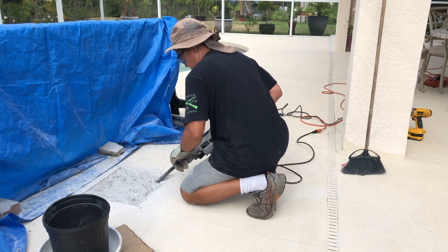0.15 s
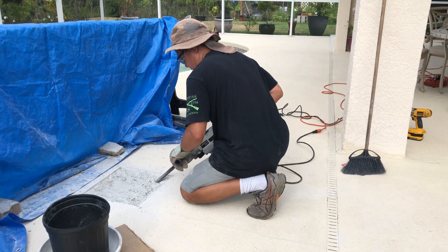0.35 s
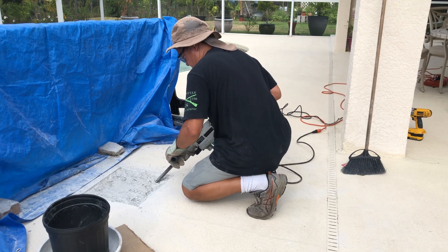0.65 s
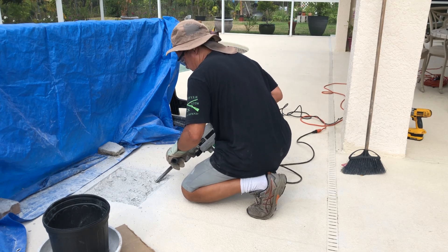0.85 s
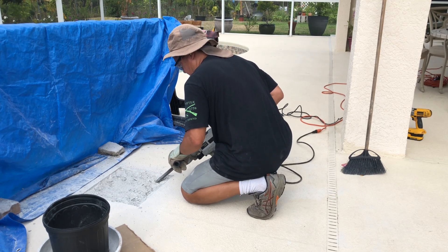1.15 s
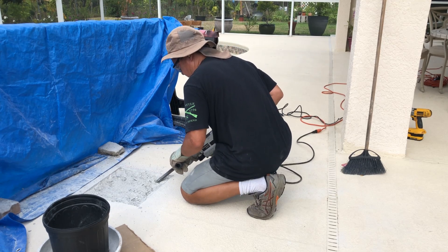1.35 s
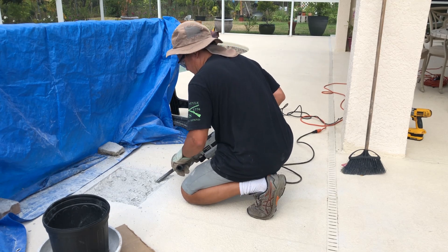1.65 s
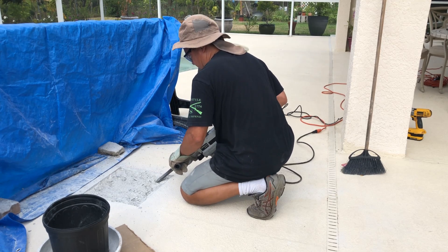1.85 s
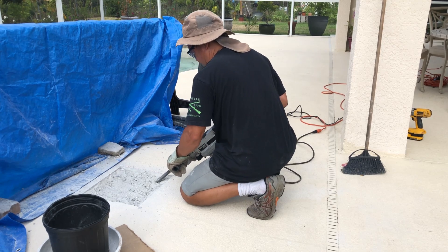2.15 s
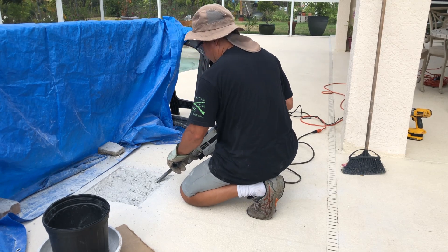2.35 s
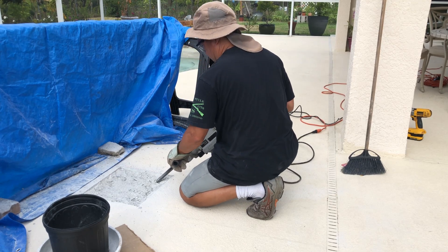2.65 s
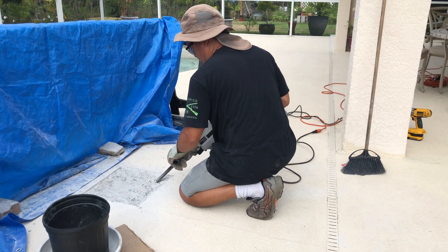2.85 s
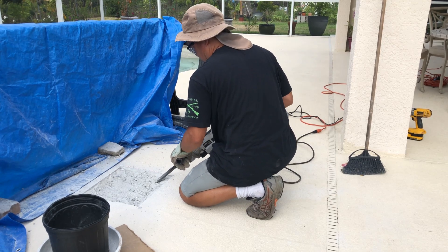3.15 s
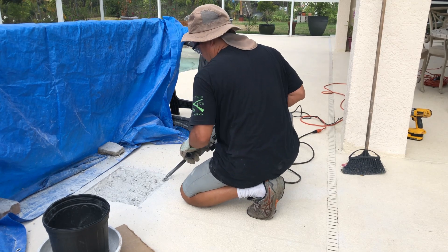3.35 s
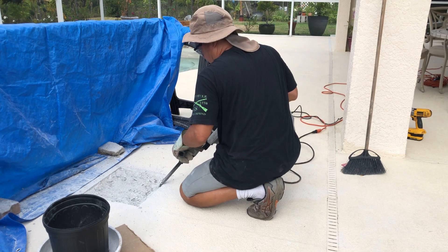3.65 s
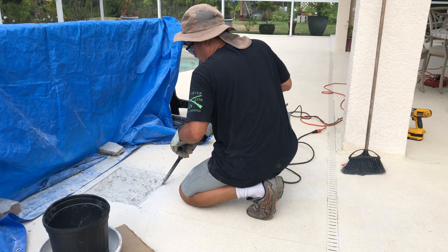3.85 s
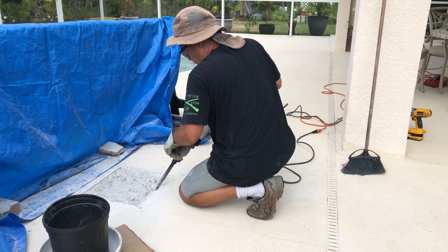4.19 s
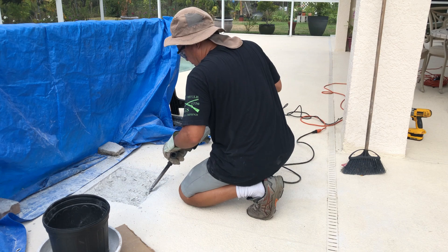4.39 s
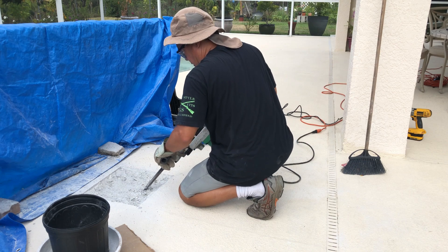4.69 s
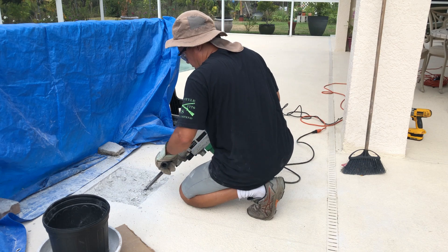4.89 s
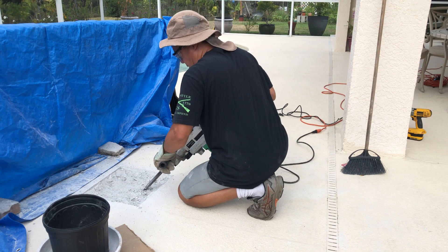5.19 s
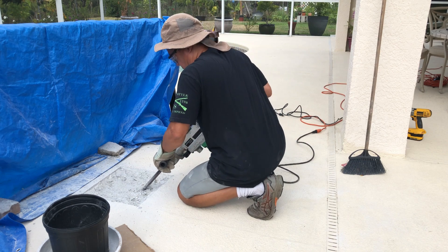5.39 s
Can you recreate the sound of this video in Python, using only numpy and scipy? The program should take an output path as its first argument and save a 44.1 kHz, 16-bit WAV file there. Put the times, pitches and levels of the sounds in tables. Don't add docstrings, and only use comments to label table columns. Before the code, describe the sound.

A loud, dense rattle of hammer blows on concrete runs for over two seconds, thudding low and crackling bright over fan hiss and whine. The blows falter and the rotor slows with falling pitch. Metal knocks, clinks and gritty scrapes follow in a quiet yard, before a last short burst of hammering builds. Small close microphone, light reflections from walls and roof.

```python
import sys
import numpy as np
from scipy import signal
from scipy.fft import rfft, irfft, next_fast_len
from scipy.io import wavfile
from scipy.ndimage import uniform_filter1d

SR = 44100
rng = np.random.default_rng(int(sys.argv[2]) if len(sys.argv) > 2 else 0)


def gain_from_db(level_db):
    decades = np.asarray(level_db, float) / 20
    return 10 ** decades


def dump_mix(stems):
    frames = np.atleast_2d(stems).T
    limited = np.clip(frames, -1, 1)
    pcm = np.round(limited * 32767).astype(np.int16)
    wavfile.write(sys.argv[1], SR, pcm)


N = 243873


def evened(x):
    return x / np.sqrt(np.mean(x ** 2) + 1e-20)


def coloured(x, points):
    size = next_fast_len(len(x))
    hz = np.fft.rfftfreq(size, 1 / SR)
    point_hz, point_db = np.transpose(points)
    gain_db = np.interp(np.log(hz + 1), np.log(point_hz + 1), point_db)
    return irfft(rfft(x, size) * gain_from_db(gain_db), size)[:len(x)]


def resonate(x, hz, width_hz):
    turn = np.exp(2j * np.pi * np.cumsum(hz * np.ones(len(x))) / SR)
    r = np.exp(-np.pi * width_hz / SR)
    return 2 * (turn * signal.lfilter([1 - r], [1, -r], x / turn)).real


def mode(x, hz, width_hz):
    r = np.exp(-np.pi * width_hz / SR)
    return evened(signal.lfilter([1, 0, -1], [1, -2 * r * np.cos(2 * np.pi * hz / SR), r * r], x))


def ringing(modes, seconds):
    t = np.arange(round(seconds * SR)) / SR
    return sum(gain_from_db(db - 60 * t / t60) * np.sin(2 * np.pi * hz * t) for hz, db, t60 in modes)


def clicks(times, sizes):
    at = np.round(np.asarray(times) * SR).astype(int)
    inside = (at >= 0) & (at < N)
    return np.bincount(at[inside], (sizes * np.ones(len(at)))[inside], N)


def patchy(x, patch_db):
    z = signal.stft(x, nperseg=512)[2]
    field = uniform_filter1d(rng.standard_normal(z.shape), size=7, axis=0)
    field = uniform_filter1d(field, size=12, axis=1)
    return signal.istft(z * gain_from_db(patch_db * evened(field)), nperseg=512)[1][:N]


def swell(middle, length, db):
    phase = np.clip((np.arange(N) / SR - middle) / length, -.5, .5)
    return gain_from_db(db) * np.cos(np.pi * phase) ** 2


def burst(rows, short_hz, short_width, short_db, tick_db, tilt_db, cut_hz, lead_s, rebound_db):
    free_blows = [2.3027, 2.3251, 2.3535, 2.3794, 2.4108, 2.439, 2.46, 2.468, 2.478, 2.488, 2.499, 2.512,
                  5.2547, 5.3022, 5.3393, 5.3724, 5.4039, 5.432, 5.46, 5.487, 5.5142]
    first_s, period_s, steady_blows = .00088, .0232406, 99
    thud_level_db, crack_level_db = -23, -24.5
    s, force, seat = np.transpose(rows)
    t = np.arange(N) / SR
    force_db, seat_db = np.interp(t, s, force), np.interp(t, s, seat)
    blows = np.append(first_s + period_s * np.arange(steady_blows), free_blows)
    blows = blows[abs(blows - s.mean()) < 2]
    luck = rng.standard_normal((len(blows), 8, 3))
    on = (t >= s[0]) & (t <= s[-1])
    level = lambda x: x / np.sqrt(np.mean(x[on] ** 2))

    thud = slab_thud(blows, luck, level, tilt_db, cut_hz, lead_s, rebound_db)
    grit, same = cracking(blows, luck, tick_db)
    crack, spall = breaking(grit, same, level, s)
    ring = singing(grit, level, s, short_hz, short_width, short_db)
    thud = gain_from_db(thud_level_db + force_db + seat_db) * thud
    bright = gain_from_db(crack_level_db + force_db) * crack + spall + ring
    fade_out = gain_from_db(-np.maximum(t - s[-1], 0) * 900.)
    return fade_out * np.array([thud, bright])


def slab_thud(blows, luck, level, tilt_db, cut_hz, lead_s, rebound_db):
    rebound_s = .018
    lead = round(lead_s * SR)
    landings = clicks(blows + .00003 * luck[:, 0, 0], gain_from_db(0.83 * luck[:, 0, 1]))
    rebound_sizes = gain_from_db(rebound_db + 3.9 * luck[:, 2, 1])
    landings = landings + clicks(blows + rebound_s + .0012 * luck[:, 1, 1], rebound_sizes)
    thud = level(signal.oaconvolve(landings, slab(tilt_db, cut_hz))[lead:][:N])
    return patchy(np.pad(thud, (0, lead)), 0.54)


def slab(tilt_db, cut_hz):
    # (frequency [Hz], width [Hz], level [dB])
    resonances = [(151.6, 110, -1.5), (187, 27, -0.5), (222, 16, 7.5), (268.2, 55, -3), (336, 119, 1.5),
                  (497, 45, -1), (642.7, 97, 3.5), (736, 420, -0.5), (962.6, 60, 1.5), (1130, 200, -17.5),
                  (1553, 197, -1.5), (1704, 61, -8.5), (2125, 110, -8), (2443, 233, -9)]
    echo_s, direct, bending = .0042, 0.84, .088
    hz = abs(np.fft.fftfreq(8192, 1 / SR))
    power = sum(gain_from_db(db) ** 2 / (1 + (2 * (hz - f) / width) ** 2) ** 2 for f, width, db in resonances)
    tilt = np.log(gain_from_db(tilt_db * np.log2(hz / 600 + 0.64)))
    bass_cut = np.log1p((cut_hz / (hz + 5)) ** 4)
    log_gain = np.log(power + 1e-9) / 2 + tilt - bass_cut
    trip = np.exp(-2j * np.pi * hz * echo_s)
    causal = np.exp(signal.hilbert(log_gain).conj()) * (trip - direct) / (1 - direct * trip)
    travel = np.exp(-4j * np.pi * bending * np.sqrt(hz))
    return irfft((causal * travel)[:len(hz) // 2 + 1])[:len(hz) // 2]


def cracking(blows, luck, tick_db):
    # (delay after the blow [s], level [dB])
    strikes = [
        (-.0028, -10.5),
        (-.0006, 2.5),
        (.0012, 0.5),
        (.003, -3),
        (.0045, -24),
        (.0085, -38),
        (0.0148, -16.5),
        (0.0184, -7),
    ]
    delay, snap_db = np.transpose(strikes)
    snap_db = snap_db + tick_db * (delay < -.002)
    times = blows[:, None] + delay + .00004 * luck[..., 0]
    snaps = clicks(times.ravel(), gain_from_db(snap_db + 1.1 * luck[..., 2]).ravel())
    u = np.arange(2000) / SR
    decay = gain_from_db(-60 * u / 0.0072) + 0.21 * gain_from_db(-60 * u / 0.057)
    fade = (1 - np.exp(-u / 0.00033)) * decay
    fresh = np.sqrt(abs(signal.oaconvolve(snaps ** 2, fade ** 2)[:N])) * rng.standard_normal(N)
    same = signal.oaconvolve(snaps, fade * rng.standard_normal(len(u)))[:N]
    return fresh + 1.14 * same, same


def breaking(grit, same, level, s):
    # (frequency [Hz], level [dB per Hz])
    grit_spectrum = [(90, -45), (710, -17.5), (1200, -3), (1350, -11), (1490, -13.5), (1640, -7),
                     (1930, -9.5), (3360, -2.5), (3830, -5.5), (7100, -6.5), (9820, -3), (16000, -13.5)]
    # (middle [s], length [s], level [dB], frequency [Hz], width [Hz])
    spalls = [(.05, 1, -42, 3420, 890), (.25, 0.8, -37.5, 8100, 302), (.3, .2, -35, 6850, 296),
              (.53, 0.39, -33, 3430, 1270), (.72, 0.99, -33.5, 5360, 300), (.85, 1, -36.5, 2320, 900),
              (.9, .6, -46, 9200, 296), (.93, 0.56, -35, 3080, 910), (1.16, 0.26, -32, 3580, 900),
              (1.55, 0.88, -40.5, 8500, 395), (1.85, 0.5, -36, 5600, 301), (2.02, 0.34, -28.5, 3270, 1100),
              (2.2, 0.23, -37.5, 5600, 300), (2.38, .035, -27.5, 5400, 400),
              (2.425, 0.075, -24.5, 4260, 500), (2.43, 0.061, -23.5, 4960, 498),
              (2.47, 0.11, -32.5, 4100, 1220), (5.3, .06, -33, 5200, 900), (5.45, 0.11, -35.5, 5000, 900),
              (5.36, 0.3, -31, 1750, 400)]
    crack = level(patchy(coloured(grit, grit_spectrum), 1.24))
    chips = coloured(grit + 0.46 * same, grit_spectrum)
    spall = np.zeros(N)
    for middle, length, db, hz, width in spalls:
        if s[0] <= middle <= s[-1]:
            spall += swell(middle, length, db) * level(resonate(chips, hz, width))
    return crack, spall


def singing(grit, level, s, short_hz, short_width, short_db):
    # (middle [s], length [s], level [dB], frequency [Hz])
    sings = [(.25, 1, -36.5, 9730), (.6, 0.33, -42, 9700), (1.03, 0.13, -30.5, 9900),
             (1.32, 0.75, -30.5, 9580), (1.56, 0.32, -33.5, 10230), (1.84, 0.27, -28.5, 9600),
             (2.2, .3, -32, 9560), (2.34, 0.19, -21.5, 9540), (5.262, 0.022, -25.5, 9000),
             (5.35, 0.23, -28, 9550), (5.48, 0.28, -26.5, 9530)]
    short = gain_from_db(short_db) * mode(grit, short_hz, short_width)
    ring = np.zeros(N)
    for middle, length, db, hz in sings:
        if s[0] <= middle <= s[-1]:
            ring += swell(middle, length, db) * level(mode(grit, hz, 30.0) + short)
    return ring


def motor():
    # (time [s], share of full speed)
    coast = [(2.29, 1), (2.4, .78), (2.87, .51), (3.2, .34), (3.5, .2), (3.8, .11), (4, .07), (5.17, .02)]
    restart_s, spin_up_s, switch_s = 5.17, .17, 5.185
    t = np.arange(N) / SR
    spin_up = 1 - np.exp(-(t - restart_s).clip(0) / spin_up_s)
    speed = np.maximum(np.interp(t, *np.transpose(coast)), spin_up)
    waver = evened(uniform_filter1d(rng.standard_normal(N), size=900))
    return airflow(t, speed, waver, switch_s) + gear_whine(speed, waver)


def airflow(t, speed, waver, switch_s):
    # (frequency [Hz], level [dB per Hz])
    fan = [(88, -61), (150, -13.5), (354, -4), (578, -14.5), (805, -8), (960, -12), (2400, -5), (5250, 2.5),
           (7920, -7), (10800, -3), (16000, -19)]
    # (frequency [Hz], level [dB per Hz])
    brush = [(290, -66), (500, -29), (855, -22), (988, -11.5), (1260, -16), (2610, -15), (5240, -15),
             (9630, -7), (12100, -5), (16000, -21)]
    # (frequency [Hz], width [Hz], level [dB])
    housing = [(2460, 400, -3), (4230, 53, -20.5), (5300, 83, -9), (6450, 45, 1), (9700, 82, -11),
               (9700, 190, -8), (11170, 150, -6), (12500, 180, -12)]
    level_db, knee, db_per_octave, strain_db = -39, 0.35, 5, 6
    stop_s, stop_db_per_s, soft_db, soft_s = 3.96, 348, -20.5, 0.082
    strain = np.minimum(uniform_filter1d(abs(np.gradient(speed)) * SR, size=3000), 2)
    stopping_db = -stop_db_per_s * (t - stop_s).clip(0)
    starting_db = soft_db * np.exp(-abs(t - switch_s) / soft_s)
    turning_db = np.where(t < switch_s, stopping_db, starting_db).clip(-80)
    hiss_db = level_db + db_per_octave * np.log2(np.minimum(speed / knee, 1)) + strain_db * strain + turning_db
    air = rng.standard_normal(N)
    air = air + 0.23 * evened(sum(gain_from_db(db) * mode(air, hz, w) * np.sqrt(w) for hz, w, db in housing))
    rush = np.maximum(np.clip(speed / 0.85, 0, 1) ** 1.19, t > switch_s)
    rotor = np.sin(2 * np.pi * np.cumsum(520.0 * speed * (1 + .3 * waver)) / SR)
    throb = 1 + np.clip(.4 - 0.5 * rush, 0, 1) * rotor
    hiss = rush * evened(coloured(air, fan)) + (1 - rush) * evened(coloured(air, brush))
    return gain_from_db(hiss_db) * patchy(hiss, 2.2) * throb


def gear_whine(speed, waver):
    # (multiple of the gear mesh, level [dB])
    gears = [(0.5, -14.5), (0.999, -3), (1.171, -10.5), (1.656, -11), (2.001, -5.5), (2.308, -13.5),
             (3.001, -1)]
    # (middle [s], length [s], mesh tone level [dB], its octave level [dB])
    loads = [
        (0.227, 1, -26.5, -39),
        (0.957, 0.4, -43, -37),
        (1.322, 0.53, -36.5, -42),
        (1.65, 1, -32.5, -35.5),
        (2.05, 0.62, -43, -38),
        (2.512, 0.13, -36.5, -45),
        (5.235, 0.11, -43, -56),
    ]
    mesh_hz, whine_db, db_per_octave = 3246, -31.5, 9
    turns = np.cumsum(mesh_hz * speed * (1 + 0.00025 * waver)) / SR
    whine = sum(gain_from_db(db) * np.sin(2 * np.pi * k * turns) for k, db in gears)
    whine = whine * gain_from_db(1.3 * evened(uniform_filter1d(waver[::-1], size=2500)))
    meshing = gain_from_db(whine_db + db_per_octave * np.log2(speed))
    whine = coloured(meshing * whine, [(1450, -28), (1750, -5.5), (3300, -14), (4300, -5),
                                       (5500, -12), (7500, -19.0)])
    for s, length, mesh_db, octave_db in loads:
        whine = whine + swell(s, length, mesh_db) * gain_from_db(2.53 * waver[::-1]) * np.sin(2 * np.pi * turns)
        whine = whine + swell(s, length, octave_db) * np.sin(4 * np.pi * turns)
    return whine


def knocks():
    # (time [s], peak [dB], thump [dB], grit
    # resonance [Hz], treble [dB])
    handling = [(3.568, -25, -4, 3560, -23), (3.859, -31.5, -30, 9420, -12), (3.911, -37, -35, 9500, 5),
                (3.942, -34.5, -32, 5830, 18), (3.964, -55, -25, 9000, -12), (4.148, -33, -4, 2370, -24),
                (4.191, -49, -13, 2370, -23), (4.311, -41, -3, 4300, -15), (4.34, -35, -2, 2310, -14),
                (4.374, -41, 5.5, 3460, -25), (4.636, -38.5, -21, 3030, -19),
                (4.646, -27.5, -1.5, 2400, -10), (4.687, -18.5, -18, 3760, -7), (4.692, -26, -22, 9300, 11),
                (4.715, -33.5, 8.5, 3820, -13), (4.905, -44.5, 6, 2460, -28), (4.951, -38, -7, 5130, -7),
                (4.963, -30.5, 7.5, 1870, -20), (4.983, -34, -10, 3700, -17), (5.068, -46, -14, 2900, -14),
                (5.179, -44, -22.5, 5560, -11), (5.187, -28.5, -8, 2300, -12)]
    # (time [s], peak [dB], thump [dB], grit resonance [Hz], steel ring [dB])
    clinks = [
        (4.067, -37.5, 0, 2300, -10),
        (4.126, -25.5, -3, 2470, -7),
        (4.232, -32, 1, 4200, -6.5),
        (4.494, -26.5, -39, 3030, -6),
    ]
    # (frequency [Hz], level [dB], t60 [s])
    bit = [(1000, 1.5, 0.1), (1360, -15, 0.33), (2363, 5.5, 0.092), (3210, -33, 0.043), (5200, -16, 0.81),
           (7000, -39, 0.65), (8200, -16, 0.027), (8920, 9, 0.21), (11360, -23.5, 0.085),
           (12670, -12, 0.076)]
    damped_db, clink_treble_db, thump_centre_hz, scrape_t60 = -22, -11, 232, 0.15
    out, t = np.zeros(N + SR), np.arange(SR // 3) / SR
    rows = [(*row, damped_db, 200.) for row in handling]
    rows += [(*row, clink_treble_db, ring, 130.) for *row, ring in clinks]
    for s, db, thump_db, grit_hz, treble_db, steel_db, width in rows:
        noise, shift = rng.standard_normal(len(t)), rng.normal(0, 2, len(bit))
        crumbs = gain_from_db(2.0 * evened(uniform_filter1d(rng.standard_normal(len(t)), size=130)))
        scrape = evened(coloured(noise, [(200, -16.5), (1200, -4.5), (3500, -2.0),
                                         (8000, treble_db + 0.5), (16000, treble_db - 15)]))
        scrape = scrape + 0.52 * mode(noise, grit_hz, width)
        scrape = scrape * (gain_from_db(-60 * t / 0.054) + 0.16 * crumbs * gain_from_db(-60 * t / scrape_t60))
        modes = [(f, d + e + 1.1 * steel_db * (f > 5000), 0.7 * r) for (f, d, r), e in zip(bit, shift)]
        steel = ringing(modes, 1 / 3)
        thump_hz = thump_centre_hz * np.exp(0.29 * rng.standard_normal())
        thump = gain_from_db(thump_db - 60 * t / 0.075) * mode(noise, thump_hz, 127.0)
        out[round(s * SR):][:len(t)] += gain_from_db(db - 13.5) * (scrape + gain_from_db(steel_db) * steel + thump)
    return out[:N]


def drags():
    # (middle [s], length [s], level [dB])
    slides = [
        (4.227, 0.46, -59),
        (4.745, 0.14, -70),
        (5.0, 0.23, -64),
    ]
    # (frequency [Hz], level [dB per Hz])
    slide_spectrum = [(400, -2), (1200, 0), (2400, 1), (4300, -2), (9000, -11), (16000, -14)]
    crunch = gain_from_db(5.3 * evened(uniform_filter1d(rng.standard_normal(N), size=200)))
    grains = rng.standard_normal(N) * crunch
    return evened(patchy(coloured(grains, slide_spectrum), 4.4)) * sum(swell(*row) for row in slides)


def porch(x):
    t60, level_db = 0.32, -11
    t = np.arange(SR // 2) / SR
    tail = coloured(rng.standard_normal(len(t)), [(100, -6.0), (3000, -7.5), (16000, -14.5)])
    tail = tail * gain_from_db(-60 * t / t60) * (t > .006)
    return gain_from_db(level_db) * signal.oaconvolve(x, tail / np.linalg.norm(tail))[:N]


def quiet_yard():
    # (frequency [Hz], level [dB per Hz])
    yard_spectrum = [(12, -34), (20, -3), (43, -3.5), (142, -8), (193, -9.5), (262, -17.5), (542, -20.5),
                     (607, -20.5), (1370, -23.5), (3530, -44), (7520, -45), (10200, -44.5), (16000, -58.5)]
    return gain_from_db(-56) * evened(patchy(coloured(rng.standard_normal(N), yard_spectrum), 0.63))


def insect():
    return gain_from_db(-91) * mode(rng.standard_normal(N), 10380, 80.)


def scene():
    # (time [s], blow force [dB], seat of the bit in the slab [dB]: 0 firm, low lifted)
    work = [
        [(0.0, 0.5, -1), (.65, -1, 0.5), (1.3, 0.5, -1), (1.95, .5, 0), (2.27, 1, -2.5), (2.37, -2, -4),
         (2.395, -5, -19), (2.45, -2, -27), (2.52, -25, -32)],
        [(5.24, -17, -7), (5.257, -7.5, -7.5), (5.3, -3.5, -4), (5.46, 0.5, -4.5), (5.53, -1, -5.5)],
    ]
    # (short ring [Hz], its width [Hz], its share [dB], striker tick [dB])
    contact = [
        (9540, 160, 2.5, 4),
        (8880, 340, 1, 8),
    ]
    # (thud tilt [dB per octave], lowest slab tone [Hz], thud lead [s], rebound [dB])
    ground = [
        (2, 107, 0.00365, -19.5),
        (-0.5, 56, 0.00284, -11),
    ]
    thud, bright = sum(burst(rows, *touch, *spot) for rows, touch, spot in zip(work, contact, ground))
    near = bright + motor() + knocks() + drags()
    return (thud + near + porch(near + thud / 4) + quiet_yard() + insect())[None]


def top_cut(x):
    return signal.sosfilt(signal.butter(12, 17010, fs=SR, output="sos"), x)


def record(dry):
    edge_hz = 15850
    thin = signal.sosfilt(signal.butter(2, 60., "highpass", fs=SR, output="sos"), dry)
    rounded = 0.65 * np.tanh(thin / 0.76)
    lowpass = signal.firwin(511, edge_hz, window=("kaiser", 8), fs=SR)
    limited = signal.oaconvolve(rounded, lowpass[None], "same")
    return top_cut(limited)


dry = scene()
out = record(dry)
dump_mix(out)
```